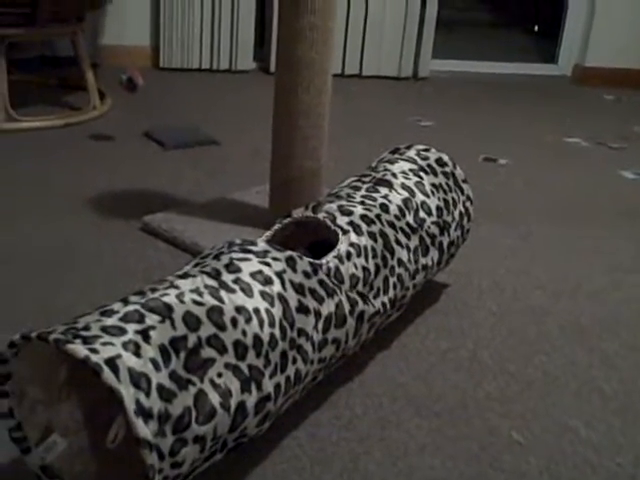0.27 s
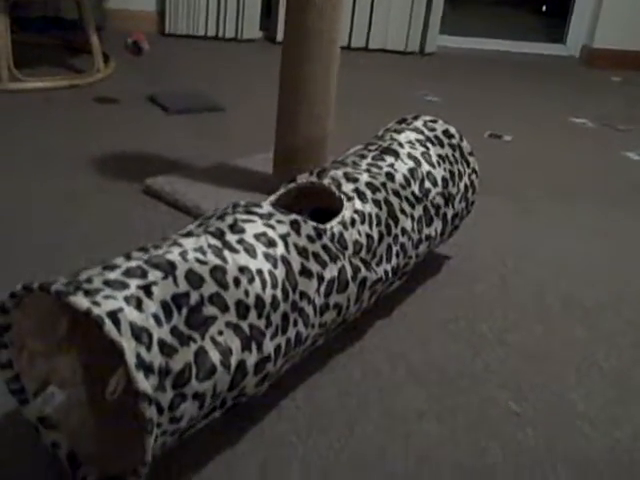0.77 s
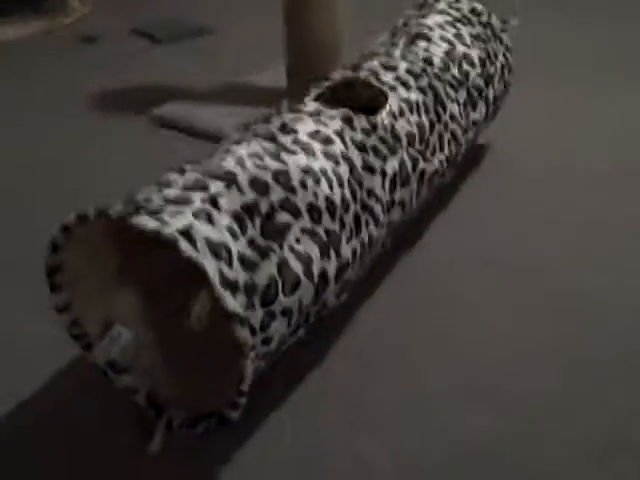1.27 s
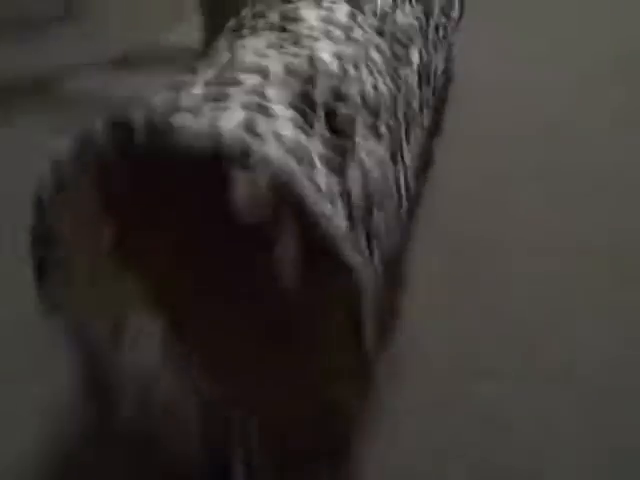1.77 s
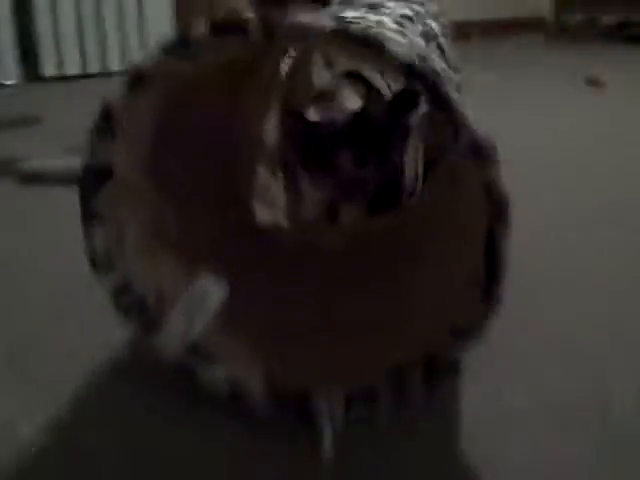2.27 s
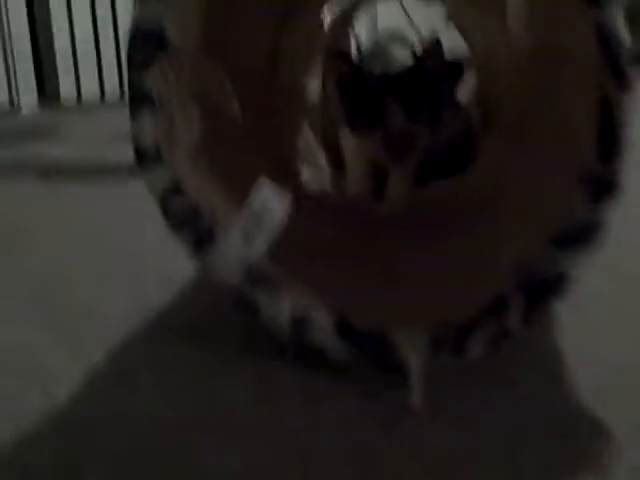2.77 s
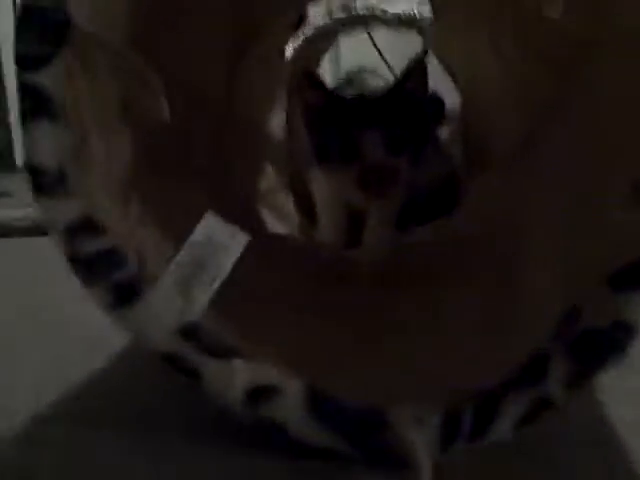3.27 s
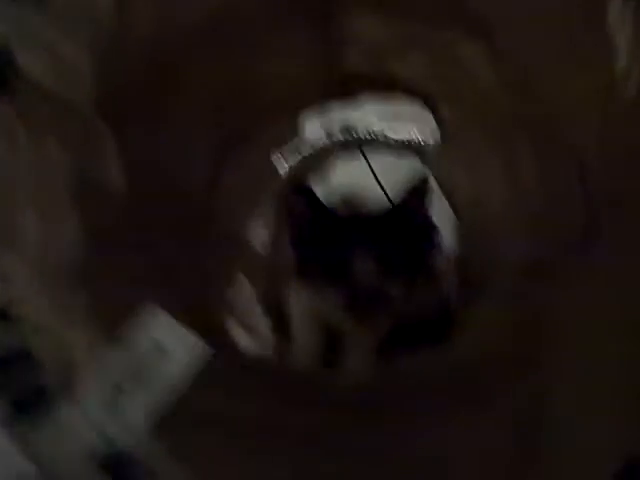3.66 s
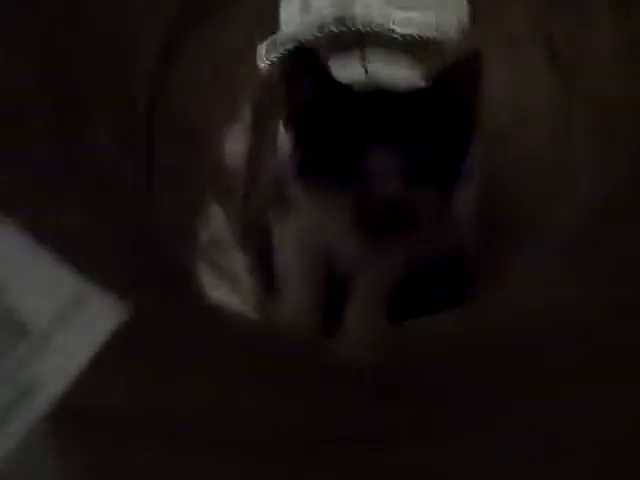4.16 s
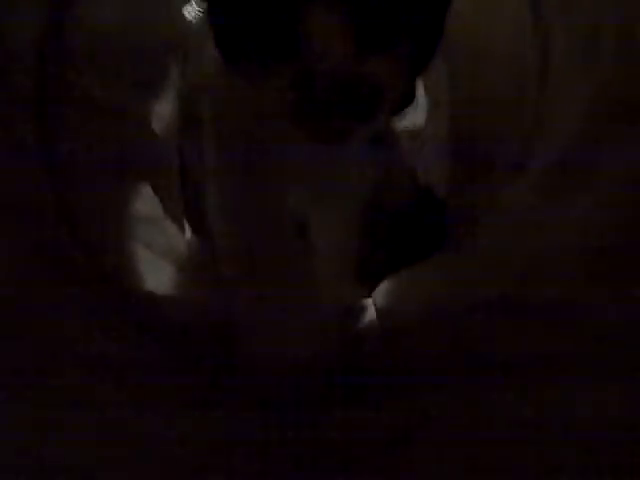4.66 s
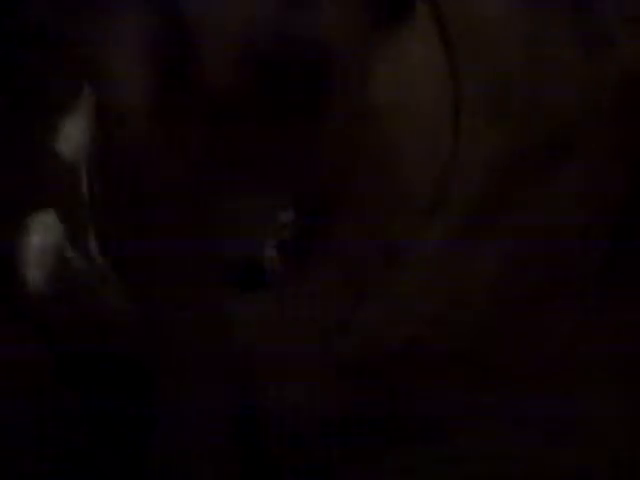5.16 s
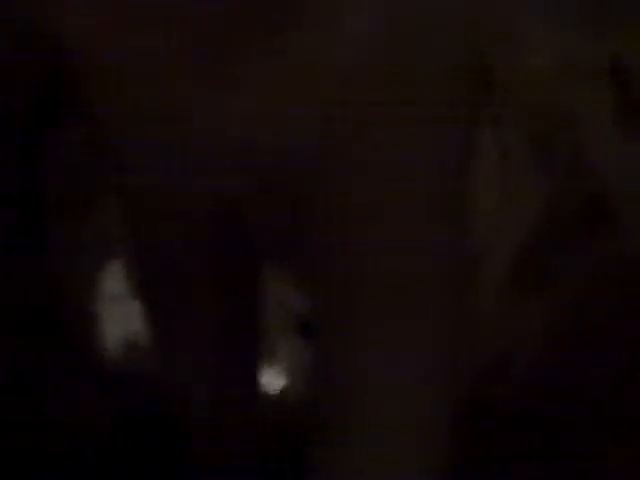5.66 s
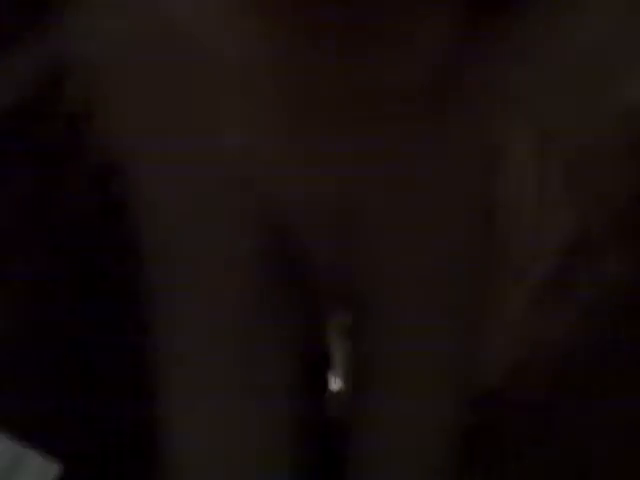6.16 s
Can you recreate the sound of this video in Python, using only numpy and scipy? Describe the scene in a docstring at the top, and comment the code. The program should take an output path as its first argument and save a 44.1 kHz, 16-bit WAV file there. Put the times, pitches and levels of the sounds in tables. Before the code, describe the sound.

A quiet carpeted room has a soft noise floor and a faint low mains hum, slightly stronger as the camera moves closer. In the first 0.4 seconds there is almost nothing but tiny ticks; then crinkly fabric snaps and rustles, busiest around 0.9 to 1.2 seconds, with light muffled bumps. A firmer double thump with a dry snap comes at 1.8. From 2.4 to 3.2 seconds heavy padded blows and low grip rumble dominate, the strongest just before 3, with coarse cloth drags. From 3.3 to 4.7 it is calmer: soft rustle, a few snaps and thin hissy scrapes near 4. Thumps and rumble return from 4.7 to 5.2, with a short whistling scrape at 5. Dense, crisp crackling fills 5.35 to 5.9, then thins to scattered snaps, a faint bump near 6.2 and an airy hiss until the end at 6.4.

```python
"""Cloth rustles and snaps as a kitten moves in a crinkly fabric tunnel on a carpeted floor.
Soft thumps shake the floor, thin hisses scrape by, and the grip of a hand-held camera rumbles as it creeps
close; a mains hum lies in the room noise. Rustle, rumble and hiss are shaped noise; snaps are noise bursts;
thumps are padded pushes that set modes ringing; whistles are noise in gliding bands; the hum is a sine."""
import sys
import numpy as np
from scipy import signal
from scipy.fft import rfft, irfft
from scipy.io import wavfile
from scipy.ndimage import uniform_filter1d

SR = 44100
rng = np.random.default_rng(int(sys.argv[2]) if len(sys.argv) > 2 else 0)


def persist_wave(psi):
    """Save psi, clipped to +-1, as 16-bit WAV."""
    counts = np.round(np.clip(psi, -1, 1) * 32767).astype(np.int16)
    wavfile.write(sys.argv[1], SR, np.atleast_2d(counts).T)


N = 282681  # samples

# Every spectrum gives a shape only: (frequency [Hz], density [dB per Hz]).

# Noise of the room and the microphone: (frequency [Hz], density [dB per Hz])
AIR_SPECTRUM = [(15, -18), (30, -10), (80, 14), (200, -12.5), (350, -4), (600, -15), (900, -8.5),
                (2500, -23), (9600, -30), (14500, -31), (16500, -23), (17800, -44)]
# Loudness of the mains hum where the camera is: (time [s], level [dB])
HUM_LEVEL = [(0, -61), (1.05, -61), (1.66, -54.5), (2.3, -53.5), (3.5, -52.5), (4.5, -49), (5.3, -53),
             (6.41, -51)]
# Fainter wavering tones, before their fade: (frequency [Hz], width [Hz], level [dB])
WAVERING_TONES = [(172.6, 2.6, -65.5), (249, 3, -59.5), (280, 8, -81), (576, 19, -71.5)]
# The wavering tones sink near the floor: (time [s], level [dB])
TONE_FADE = [(0, -3.5), (1.5, -5), (3.5, -8.5), (6.41, -4)]
HUM_HZ, AIR_DB = 120, -62

# Low noise of the hand on the grip: (frequency [Hz], density [dB per Hz])
RUMBLE_SPECTRUM = [(12, -9), (30, 9), (70, -7.5), (110, -7.5), (160, -64)]
# Soft shuffle on the carpet: (frequency [Hz], density [dB per Hz])
SHUFFLE_SPECTRUM = [(80, -35), (150, 1.5), (250, -1), (400, -4), (600, -11), (900, -23), (1400, -39)]
# The hand jolts the camera:
# (time of peak [s], rumble level [dB], time to rise 20 dB [s], time to fall 20 dB [s])
GRIP_JOLTS = [(.945, -50, 0.3, -0.06), (1.2, -66, 2.5, 2), (1.415, -51.5, 0.25, .08), (1.72, -52, 0.6, 0.8),
              (1.875, -51, -0.2, 0.6), (2.05, -56, -6, -1), (2.23, -53, 0.2, 1.6), (2.39, -39, 0.02, .1),
              (2.43, -26, 0.02, -0.02), (2.59, -37, 0.04, 0.3), (2.76, -33.5, -0.06, 0.12),
              (2.95, -33, 0.08, 0.01), (3.12, -34.5, .14, .2), (3.36, -47, 1.4, .38),
              (3.77, -43.5, -0.1, 0.1), (3.98, -45.5, 0.2, 1.5), (4.19, -44.5, 0.1, .15),
              (4.34, -54, 0.7, -4.5), (4.75, -46, 0.27, .15), (4.83, -36.5, 0.36, 0.07),
              (5.005, -33.5, 0.1, 0.35), (5.21, -48, -0.9, 0.4), (5.43, -43.5, .12, -0.25),
              (5.6, -61, -2, -3), (5.77, -43.5, 0.35, -0.2), (5.86, -51, 5, 3)]
STILL_RUMBLE_DB, STILL_SHUFFLE_DB = -69.5, -57
SHUFFLE_DB = -18.5  # against the peak of each blow
SHUFFLE_RISE_S, SHUFFLE_FALL_S = 0.0087, 0.15  # for 20 dB

# Soft blows on the floor: (time of peak [s], peak level of the push [dB], direction [+-1],
# pitch of the push [Hz], pitch of the hollow [Hz], shudder against the push [dB], knock against shudder [dB])
FLOOR_BLOWS = [(0.4545, -34.5, -1, 470, 250, -23, 4), (0.9434, -32, -1, 370, 317, -20, 6),
               (1.4071, -38.5, 1, 335, 251, -11, -10), (1.665, -39, -1, 152, 207, 0, -20),
               (1.714, -43, -1, 322, 198.5, -3, -10), (1.8335, -18.5, -1, 240, 233, -15.5, 4),
               (1.8415, -18.5, -1, 305, 219, -11, -13), (1.854, -34, -1, 337, 206.6, -8, 2),
               (2.2409, -41.5, -1, 357, 128, -8.5, 4), (2.4176, -13, -1, 119.5, 473, -9.5, -20.5),
               (2.4285, -15, 1, 215, 453.5, -7, -14), (2.44, -12.5, 1, 330, 351, -15.5, 4.5),
               (2.475, -29, 1, 324, 437, -12, -20), (2.6235, -15.5, 1, 262, 287.8, -11.5, -10),
               (2.7515, -21.5, -1, 106, 297, -14, -9), (2.775, -27.5, 1, 300, 403.6, -6, -12),
               (2.7997, -23.5, 1, 260, 301, -8.5, -15), (2.9508, -2.5, -1, 178, 190, -11.5, -21),
               (2.9896, -17, 1, 115, 218, -10, -22), (3.0721, -17, 1, 238, 265, -13, -10.5),
               (3.108, -18.5, -1, 113.5, 228.3, -10.5, -7), (3.205, -18, 1, 238, 330, -12, -10.5),
               (3.2265, -23.5, 1, 276, 300, -14, -13), (4.7434, -23.5, -1, 47.6, 177, -15, -33),
               (4.859, -29, 1, 139, 254, -2, -36), (4.8763, -26.5, 1, 308, 299, -5.5, -12),
               (5.0073, -18.5, -1, 200, 126, -2, -23), (5.046, -20.5, 1, 141, 152, -10.5, -23),
               (5.105, -22, 1, 243, 325.4, -7.5, -9.5), (5.127, -21.5, -1, 238, 285.4, -14, -21),
               (5.165, -25, 1, 258, 301, -13.5, -22), (5.4204, -32, -1, 256, 122, -7, -10),
               (5.6935, -38.5, -1, 410, 130, -6.5, -6), (6.2067, -35.5, -1, 430, 120, -15, -13)]
# Resonances of the floor: (frequency [Hz], width [Hz], level [dB])
FLOOR_RESONANCES = [(106, 37, 19.5), (172, 14, -1), (239.4, 18, 12), (305, 53, -18), (360, 27, 6),
                    (460, 19, -17)]
# Higher resonances of the floor, heard as a knock, its level set for each blow:
# (frequency [Hz], width [Hz], level [dB])
KNOCK_RESONANCES = [(678, 173, 9.5), (840, 58, 2), (1093, 19, -14), (1172, 60, -3.5), (1480, 250, -18)]
# Cloth shaken by a blow: (frequency [Hz], density [dB per Hz])
RATTLE_SPECTRUM = [(300, -41), (600, -37), (1000, 22), (1600, 3), (2400, 12), (3500, -41), (6000, -52)]
THUMP_T60_S = 0.31  # decay of the shudder
RATTLE_DB = -24  # against the push

# Hissy bands, some thin as a whistle, as something scrapes:
# (time of start [s], length [s], start frequency [Hz], end frequency [Hz], width [Hz], level [dB])
SCRAPE_BANDS = [(1.287, 0.063, 1610, 1700, 150, -55.5), (1.803, 0.13, 2500, 2480, 500, -77.5),
                (3.108, 0.044, 6300, 6600, 900, -58), (3.964, 0.086, 3470, 3760, 400, -59.5),
                (4.136, 0.17, 3520, 4000, 250, -64), (4.84, 0.034, 1140, 1040, 350, -43.5),
                (5.005, 0.08, 3500, 3600, 200, -50), (5.003, 0.053, 6250, 6100, 250, -55),
                (5.004, 0.071, 6760, 6750, 400, -56), (6.029, 0.46, 5060, 4770, 1300, -61)]

# Creases popping: (time [s], level [dB], pitch of the crease [Hz], bright edge against it [dB])
CREASE_POPS = [(.078, -59, 8000, 4), (.165, -60, 8000, 4), (0.391, -49, 5500, -13),
               (0.4047, -42, 7800, -6.5), (.432, -32, 7200, -10), (0.439, -37, 6000, 5),
               (0.451, -26, 1780, -2), (0.458, -35, 4630, 5), (.51, -37.5, 2400, 2),
               (0.6625, -32.5, 2050, -28.5), (0.844, -41, 2440, -3), (.8762, -43, 1550, 4),
               (.8938, -39, 2370, -2), (0.9203, -37.5, 4500, 3), (.9281, -40, 3490, 7),
               (.9795, -28.5, 2300, -22), (0.992, -31, 2900, -19), (1.0004, -28.5, 3010, -20),
               (1.033, -43, 7500, 8), (1.048, -24.5, 1120, -10.5), (1.0547, -33, 3600, 6),
               (1.072, -41, 7500, 7), (1.103, -38, 1250, -10), (1.1344, -25.5, 990, -20),
               (1.16, -29, 2000, -17), (1.1748, -30.5, 1710, -25), (1.245, -32, 3760, -19),
               (1.407, -33.5, 1010, -5.5), (1.54, -48.5, 6000, 3), (1.7148, -31, 1110, -6),
               (1.76, -44, 1080, -18), (1.791, -25.5, 2200, -8), (2.24, -33.5, 1820, -17),
               (2.427, -27, 900, -35.5), (2.437, -18.5, 1060, -31), (2.454, -37, 2190, -32),
               (2.624, -37, 800, -32), (2.948, -24, 800, -33), (3.083, -33, 1200, -30),
               (3.11, -34, 1190, -25), (3.215, -32, 1270, -19), (3.4413, -39.5, 1540, -26),
               (3.76, -41, 1370, -5), (4.2695, -32, 970, -1.5), (4.4388, -41.5, 3880, 8),
               (4.4976, -41, 6120, -1), (4.513, -38.5, 5300, 2), (4.5656, -36, 5130, 2),
               (4.6078, -40, 3470, 0), (4.6305, -38.5, 1410, -10.5), (4.6656, -44, 3500, -11),
               (4.6822, -46, 1500, -14), (4.7455, -37, 2800, -23), (4.7869, -34, 5380, 6),
               (4.806, -41, 7000, -2), (4.843, -23, 1970, -24), (4.9323, -39, 2150, 3),
               (4.943, -29.5, 6000, -4), (5.007, -32, 900, -25), (5.135, -39.5, 5000, 0),
               (5.1555, -37, 2350, -2), (5.1765, -40.5, 5380, -2), (5.2864, -44, 4000, -17),
               (5.346, -50.5, 3000, 8.5), (5.368, -42, 7000, 5), (5.373, -28.5, 3360, -8),
               (5.3875, -34, 4820, 1), (5.3948, -27, 3120, -11), (5.406, -32.5, 5000, 9),
               (5.4196, -25.5, 4840, -12), (5.4327, -21, 2470, -4), (5.446, -33, 4000, -1),
               (5.459, -32, 3000, -4), (5.471, -41, 3400, -20), (5.49, -37.5, 3000, -4),
               (5.496, -31, 2260, -14), (5.509, -27.5, 2430, -8), (5.52, -34.5, 6680, -10),
               (5.529, -41, 5000, -8), (5.552, -45, 5000, 0), (5.5565, -29.5, 4000, 8),
               (5.568, -32, 3160, -13), (5.575, -45, 6000, 2), (5.586, -36, 7970, 1),
               (5.6057, -31, 2490, 5), (5.621, -42, 4610, 6), (5.643, -44, 4000, 5),
               (5.6516, -33, 2500, -6), (5.6752, -28.5, 3460, 6.5), (5.69, -32.5, 1020, -4),
               (5.7106, -35.5, 7320, 5), (5.7342, -31, 2090, 2), (5.75, -47, 4000, 0),
               (5.756, -38, 2940, 4), (5.7703, -49, 2810, -4), (5.7995, -38, 2150, -1),
               (5.825, -39, 3680, -4), (5.846, -43.5, 3470, 11), (5.8519, -27.5, 2050, -7),
               (5.8724, -43, 1420, -4), (5.9651, -45, 4570, -18.5), (5.9873, -41, 3830, -21),
               (6.007, -29.5, 3950, -3), (6.1662, -34.5, 2840, -2), (6.1853, -32, 1980, 6),
               (6.2047, -33.5, 1040, 9.5), (6.2382, -29.5, 1980, -3), (6.2706, -45, 2280, 8),
               (6.375, -39, 4950, -1), (6.3844, -45, 7540, 8), (6.4013, -41, 3660, -10)]
SNAP_T60_S = 0.01  # decay of the body of a snap

# Body of the rustle: (frequency [Hz], density [dB per Hz])
BODY_SPECTRUM = [(700, -8.5), (1300, 1), (2000, 0.5), (3000, -2), (3800, -2.5), (5500, -9), (8000, -15),
                 (11000, -22), (14000, -32)]
# Thin top of the rustle, also the edge of the snaps: (frequency [Hz], density [dB per Hz])
FIZZ_SPECTRUM = [(3500, -7.5), (6000, -0.5), (9000, -0.5), (11500, -0.5), (14000, 2), (16000, -3),
                 (17500, -18), (18500, -30)]
# Heavy underside of the rustle: (frequency [Hz], density [dB per Hz])
DRAG_SPECTRUM = [(250, -10), (500, 2), (900, -0.5), (1400, -7.5), (2200, -17), (3200, -24)]
# Strokes of cloth on cloth: (time of peak [s], peak level [dB], time to rise 20 dB [s],
# time to fall 20 dB [s], fizz against body [dB], drag against body [dB])
CLOTH_STROKES = [(0, -66, .1, 0.5, 0.5, 2.5), (.397, -56, -0.08, .2, -9, -2.5),
                 (.45, -52, 0.02, 0.17, 1.5, -6), (0.563, -52, 0.25, 0.05, -17, -4),
                 (.675, -57, -0.15, 0.25, -15, -9), (.86, -62, 0.03, 0.5, -1, -1),
                 (0.931, -52.5, 0.09, 0.1, -2.5, -0.5), (.99, -45.5, 0.0157, 0.33, -22, -2),
                 (1.05, -52, 0.11, 0.05, -1.5, -11), (1.16, -47, 0.1, .1, -8, -2),
                 (1.26, -55, 0.45, 0.37, -8, -1.5), (1.42, -60.5, 0, 1, -5, 1.8),
                 (1.704, -51.5, -0.04, 0.18, -4, -3.5), (1.805, -54.5, -0.1, .3, 0, -13),
                 (2.02, -61, 0.57, 2.5, -5.5, -1), (2.432, -61, 0.05, 0, -17, 6),
                 (2.454, -38, .04, 0.0855, -21, 7.5), (2.6, -65, 0.4, 0.1, -3, -3),
                 (2.64, -53.5, 0.2, 0.19, -7, 5), (2.769, -53.5, .018, 0.13, -9, 7.5),
                 (2.799, -46.5, 0.06, 0.09, -14, 2.5), (2.958, -40, 0.0132, 0.1073, -9, 12),
                 (2.983, -36.5, 0.0465, 0.0934, -11.5, -1), (3.112, -53, .012, 0.13, 4, 0.1),
                 (3.2, -55, 0.36, 0.33, -10, 1), (3.48, -63.5, -0.23, -0.27, -4, 0.1),
                 (3.785, -62, -0.07, 0.9, -0.5, 6), (3.85, -57.5, 0.06, 2.2, -12.5, -1),
                 (4.17, -47, .45, 0.39, -11, -10), (4.45, -55, 0.2, 0.43, -6, -2),
                 (4.745, -64, -0.3, -0.04, -9, -11), (4.781, -46.5, 0.15, 0.24, -6.5, -1.5),
                 (4.85, -45.5, 0.05, 0.17, -7, 1), (4.95, -51, 0.13, 0.14, -10, 2),
                 (5.015, -44, -0.06, .15, -11.5, -3.5), (5.07, -45.5, -0.43, 0.09, -8, -3),
                 (5.17, -54, 0, 0, -1, -9), (5.27, -61, 0.5, -0.3, -5.5, -1.5),
                 (5.365, -50.5, 0.17, 0.23, -11.5, 2), (5.422, -39.5, 0.04, 0.08, -6.5, -8.5),
                 (5.53, -61, -0.4, -0.1, -10, 6), (5.61, -53, 0.2, 0.11, -12, 2.5),
                 (5.693, -46.5, -0.05, 0.11, -7, -5), (5.82, -52, 0.23, 0.02, -8, -4),
                 (5.86, -62.5, 0.5, 0.1, -3, -7), (5.965, -61, -0.8, 3, -14, -7),
                 (6.09, -56.5, -0.03, .5, -18, -2), (6.195, -45, 0.05, 0.5, -4.5, -25),
                 (6.3, -52, .5, 1, -8.5, 1.5)]
# How unevenly the cloth slips, before limiting: (time [s], spread [dB])
SLIP_SPREAD = [(0, 4), (1.3, 4), (2.3, 1), (4.4, .5), (4.8, 5.5), (5.3, 5), (5.7, 12), (6, 3), (6.41, 2)]
RESTING_DB = -77  # the cloth never lies quite still

RISE_CURVE, FALL_CURVE = 1.42, 0.99  # above 1 the top of a swell is rounded and its ends are steep
EDGE_HZ = 17700  # upper band limit


def gain_of(db):
    """Turns decibels into an amplitude factor."""
    return 10 ** (np.asarray(db) / 20)


def evened(x):
    """Scales to rms 1."""
    return x / np.sqrt(np.mean(x ** 2) + 1e-20)


def steadied(x, shape):
    """Shapes noise by an envelope and gives the result the energy of that envelope."""
    shaped = x * shape
    return shaped * np.linalg.norm(shape) / np.linalg.norm(shaped)


def curve(rows):
    """Draws a two-column table sample by sample, with straight lines between its points."""
    s, values = np.transpose(rows)
    return np.interp(np.arange(N) / SR, s, values)


def coloured(x, points):
    """Filters x by a spectrum, joined up over log frequency, and scales it to rms 1."""
    f, db = np.transpose(points)
    hz = np.fft.rfftfreq(len(x), 1 / SR)
    shape_db = np.interp(np.log(hz + 1), np.log(f + 1), db, -90, -90)
    return evened(irfft(rfft(x) * gain_of(shape_db), len(x)))


def resonate(x, hz, width):
    """A resonance of gain 1 that follows the pitch hz: shift it to zero, low-pass, shift it back."""
    turn = np.exp(2j * np.pi * np.cumsum(hz * np.ones(len(x))) / SR)
    r = np.exp(-np.pi * width / SR)
    return 2 * (turn * signal.lfilter([1 - r], [1, -r], x / turn)).real


def ringing(x, modes):
    """Noise through a set of modes, each filtered twice for steep skirts; rms 1."""
    total = 0
    for hz, width, db in modes:
        mode = resonate(resonate(x, hz, width), hz, 3 * width)
        total = total + gain_of(db) * evened(mode)
    return evened(total)


def swell(s, db, rise_s, fall_s):
    """Power over time of events that each climb to a peak and die away."""
    step = 64  # samples between the points computed
    power = np.zeros(N // step + 1)
    t = np.arange(len(power)) * step / SR
    for at, top_db, up, down in np.broadcast(s, db, rise_s, fall_s):
        away = abs(t - at)
        # shorter or negative times count as 5 ms
        rise = (away / max(up, .005)) ** RISE_CURVE
        fall = (away / max(down, .005)) ** FALL_CURVE
        power = power + gain_of(2 * top_db - 40 * np.where(t < at, rise, fall))
    return np.interp(np.arange(N) / SR, t, power)


def slips(spread_db, per_s, grain_s):
    """Loudness of many tiny slips of uneven size: grainy, yet even over longer times."""
    size_db = np.clip(spread_db, 0, 6.5) * np.minimum(rng.exponential(1, N), 2.5)
    starts = gain_of(size_db) * (rng.random(N) < per_s / SR)
    decay = np.exp(-2 / (grain_s * SR))
    power = 1.07 + signal.lfilter([1], [1, -decay], starts ** 2)
    return np.sqrt(power / uniform_filter1d(power, SR // 8))


def add(mix, s, sound):
    """Adds a sound to the mix at a time in seconds."""
    part = mix[round(s * SR):][:len(sound)]
    part += sound[:len(part)]


def room():
    """A mains sine of changing loudness, noise in narrow resonances as wavering tones, and room noise."""
    turns = HUM_HZ * np.arange(N) / SR + rng.random()
    hum = np.sqrt(2) * gain_of(curve(HUM_LEVEL)) * np.sin(2 * np.pi * turns)
    tones = np.zeros(N)
    for hz, width, db in WAVERING_TONES:
        tones += gain_of(db) * evened(resonate(rng.standard_normal(N), hz, width))
    air = gain_of(AIR_DB) * coloured(rng.standard_normal(N), AIR_SPECTRUM)
    return hum + tones * gain_of(curve(TONE_FADE)) + air


def grip():
    """Lumpy low noise from the hand; above it the carpet shuffles around each blow."""
    s, db = np.transpose(FLOOR_BLOWS)[:2]
    jolting = swell(*np.transpose(GRIP_JOLTS)) + gain_of(STILL_RUMBLE_DB) ** 2
    shuffling = swell(s, db + SHUFFLE_DB, SHUFFLE_RISE_S, SHUFFLE_FALL_S) + gain_of(STILL_SHUFFLE_DB) ** 2
    rumble = coloured(rng.standard_normal(N), RUMBLE_SPECTRUM)
    shuffle = coloured(rng.standard_normal(N), SHUFFLE_SPECTRUM)
    return np.sqrt(jolting) * rumble + np.sqrt(shuffling) * shuffle


def thumps():
    """One padded push, then the floor shudders in its modes and the cloth rattles a little later."""
    out, t = np.zeros(N), np.arange(SR // 3) / SR
    dying = gain_of(-60 * t / THUMP_T60_S)
    for s, db, way, hz, hollow_hz, shudder_db, knock_db in FLOOR_BLOWS:
        a, b = rng.standard_normal((2, len(t)))
        lead = 0.791 / hz  # the push builds for most of a cycle before its peak
        u = (np.pi * hz * (t - lead)) ** 2
        push = np.sign(way) * (1 - 2 * u) * np.exp(-u)
        # the hollow under the struck spot booms on an unsteady pitch
        waver = 1 + 0.136 * evened(uniform_filter1d(b, 500))
        hollow = np.sin(2 * np.pi * np.cumsum(hollow_hz * waver) / SR)
        floor = ringing(a, FLOOR_RESONANCES) + 2.1 * hollow
        shudder = steadied(floor, (1 - np.exp(-t / 0.011)) * dying)
        knock = steadied(ringing(a, KNOCK_RESONANCES), (1 - np.exp(-t / 0.0014)) * dying ** 2.54)
        rattle = coloured(b, RATTLE_SPECTRUM) * (1 - np.exp(-(t / 0.016) ** 2)) * dying ** 2.4
        ring = gain_of(shudder_db) * (shudder + gain_of(knock_db) * knock)
        add(out, s - lead, gain_of(db) * (push + ring + gain_of(RATTLE_DB) * rattle))
    return out


def whistles():
    """Scraping heard as noise in one narrow gliding resonance, applied twice."""
    out = np.zeros(N)
    for s, length, start_hz, end_hz, width, db in SCRAPE_BANDS:
        hz = np.linspace(start_hz, end_hz, round(length * SR))
        noise = rng.standard_normal(len(hz))
        band = resonate(resonate(noise, hz, width), hz, width)
        add(out, s, gain_of(db) * evened(band) * signal.windows.tukey(len(hz), .4))
    return out


def snaps():
    """Each crease lets go with a short burst around its pitch, with a quicker bright edge."""
    out, t = np.zeros(N), np.arange(1500) / SR
    dying = gain_of(-60 * t / SNAP_T60_S)
    for s, db, hz, edge_db in CREASE_POPS:
        a, b = rng.standard_normal((2, len(t)))
        pitched = resonate(resonate(a, hz, 0.4 * hz), hz, 4 * hz)
        body = steadied(pitched, (1 - np.exp(-t / 0.00058)) * dying)
        edge = steadied(coloured(b, FIZZ_SPECTRUM), (1 - np.exp(-t / 0.00034)) * dying ** 1.68)
        add(out, s, gain_of(db) * (body + gain_of(edge_db) * edge))
    return out


def rustle():
    """Body, fizz and drag of the cloth share most slips; body and fizz also have slips of their own."""
    s, db, rise_s, fall_s, fizz_db, drag_db = np.transpose(CLOTH_STROKES)

    def level(above_db):
        """Amplitude of one layer: its strokes over the resting cloth, summed in power."""
        return np.sqrt(swell(s, db + above_db, rise_s, fall_s) + gain_of(RESTING_DB) ** 2)

    spread_db = curve(SLIP_SPREAD)
    shared = slips(spread_db, 500, 0.00068)
    body = slips(0.82 * spread_db, 300, 0.0025) * coloured(rng.standard_normal(N), BODY_SPECTRUM)
    fizz = slips(0.29 * spread_db, 300, 0.00037) * coloured(rng.standard_normal(N), FIZZ_SPECTRUM)
    drag = coloured(rng.standard_normal(N), DRAG_SPECTRUM)
    return shared * (level(0) * body + level(fizz_db) * fizz + level(drag_db) * drag)


def scene():
    """All sources at the microphone, from the room up to the cloth."""
    return (room() + grip() + thumps() + whistles() + snaps() + rustle())[None]


def record(dry):
    """The band limit of the recorder: a steep low-pass."""
    low_pass = signal.firwin(511, EDGE_HZ, window=("kaiser", 9), fs=SR)
    return signal.oaconvolve(dry, low_pass[None], "same")


dry = scene()
out = record(dry)
persist_wave(out)
```